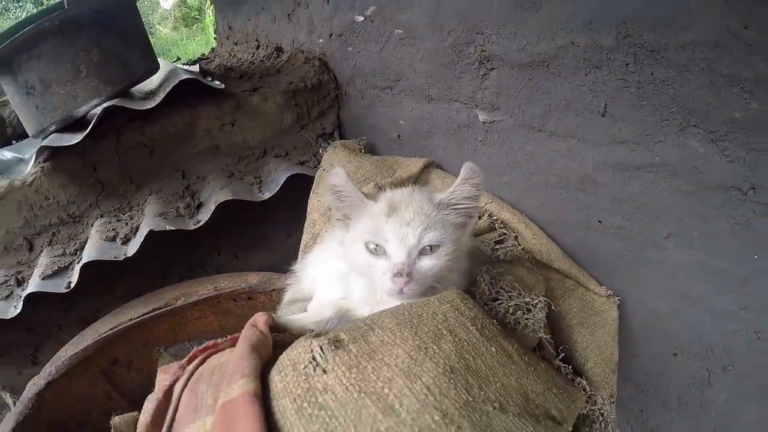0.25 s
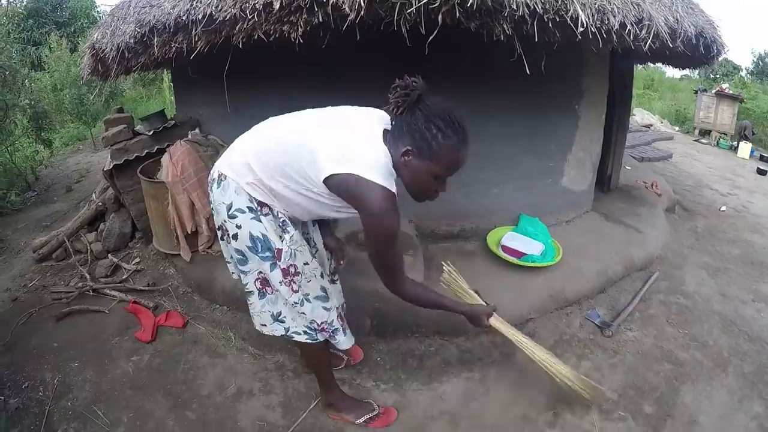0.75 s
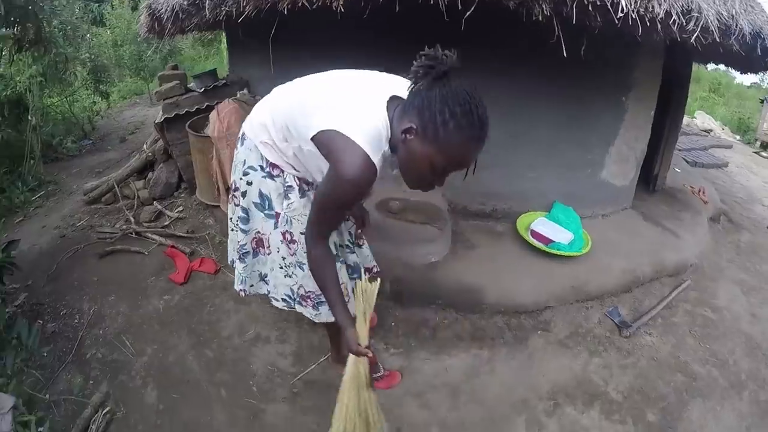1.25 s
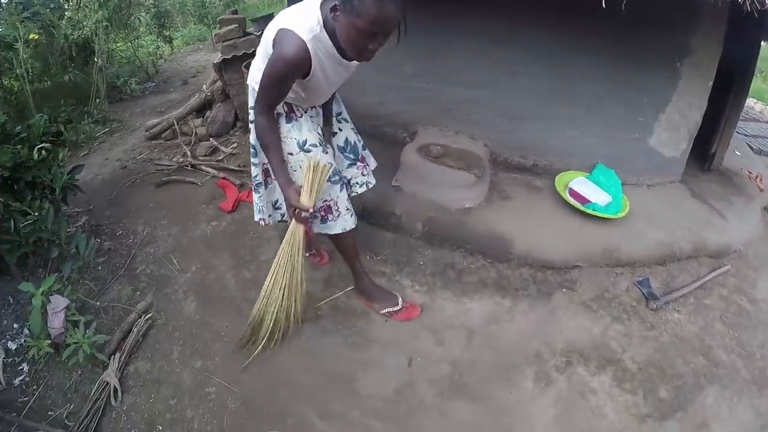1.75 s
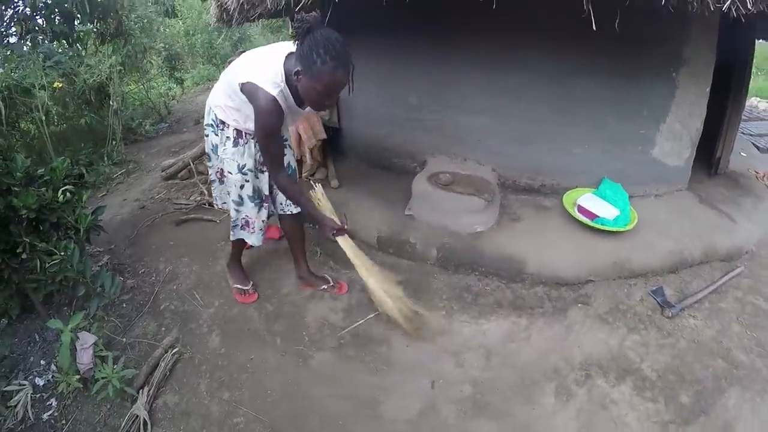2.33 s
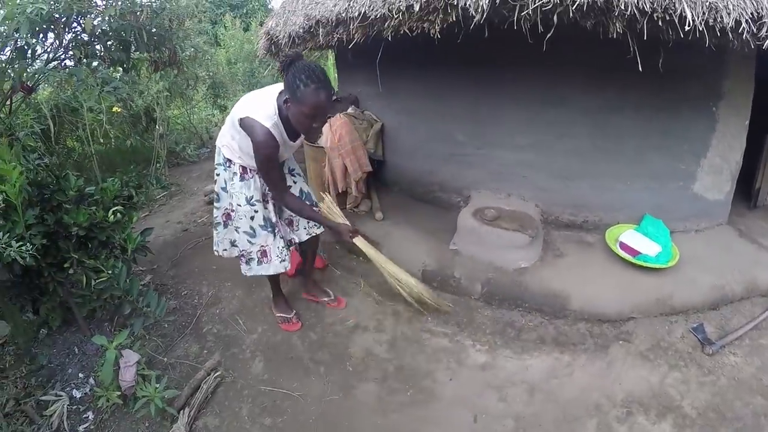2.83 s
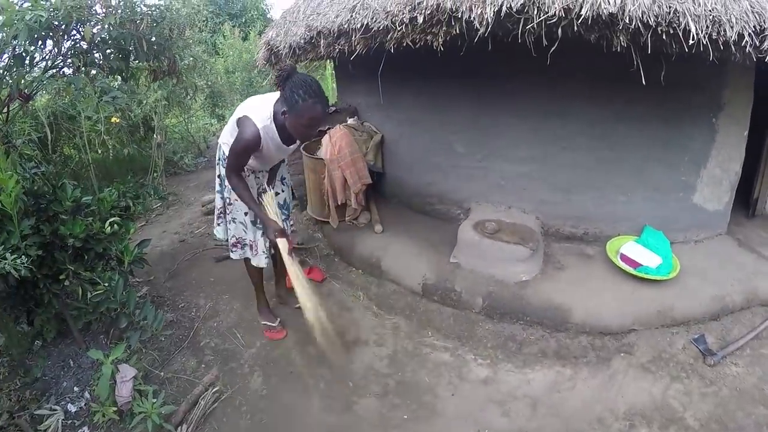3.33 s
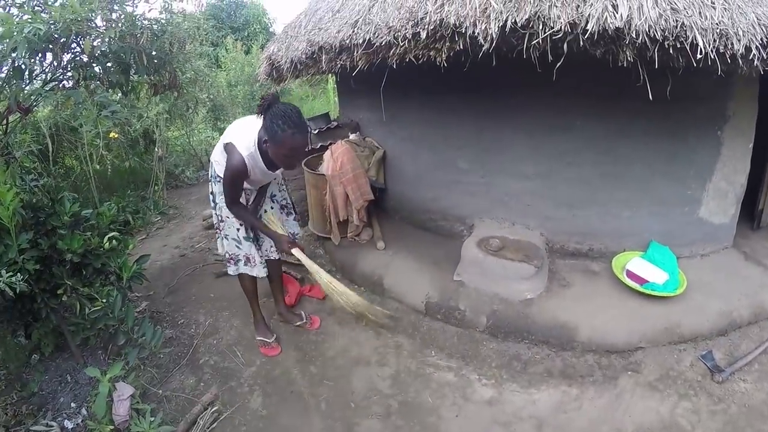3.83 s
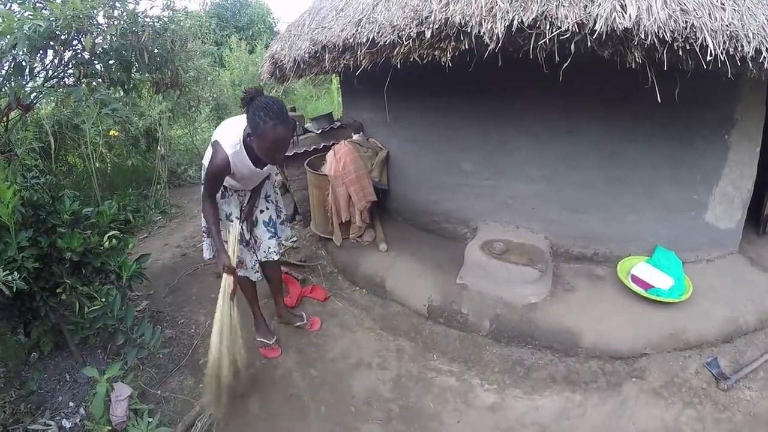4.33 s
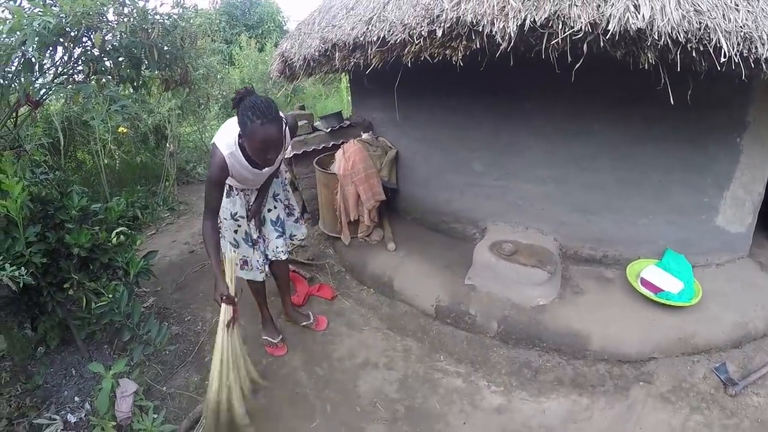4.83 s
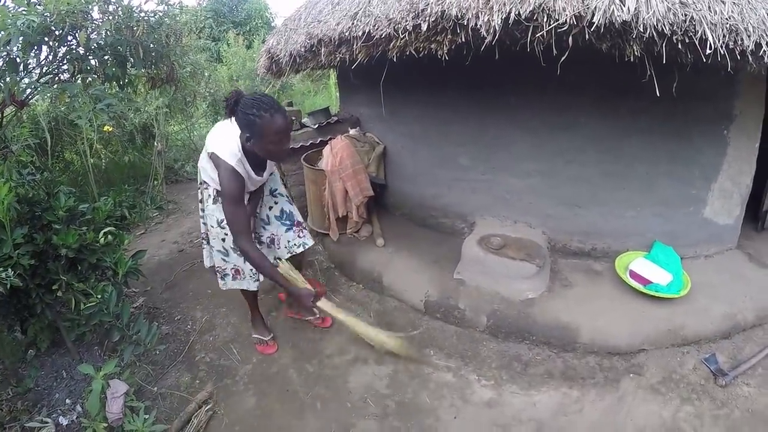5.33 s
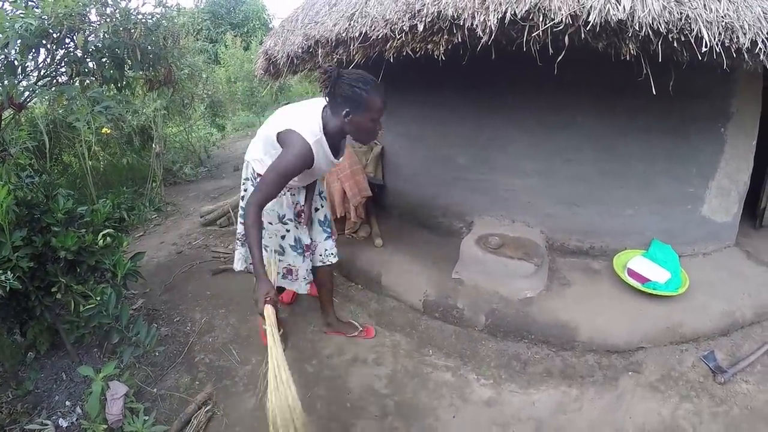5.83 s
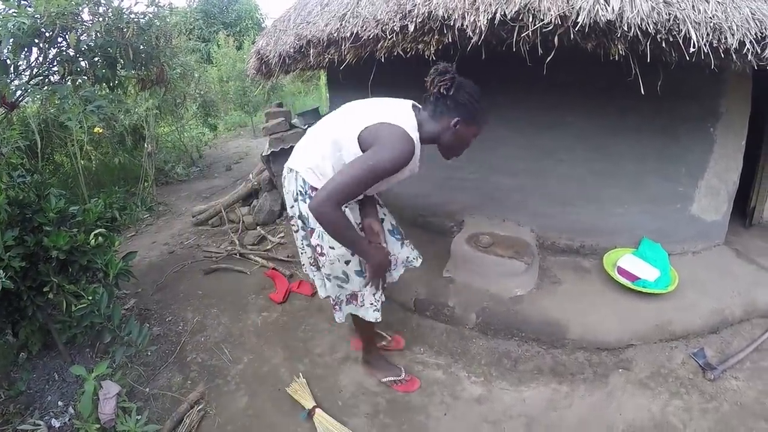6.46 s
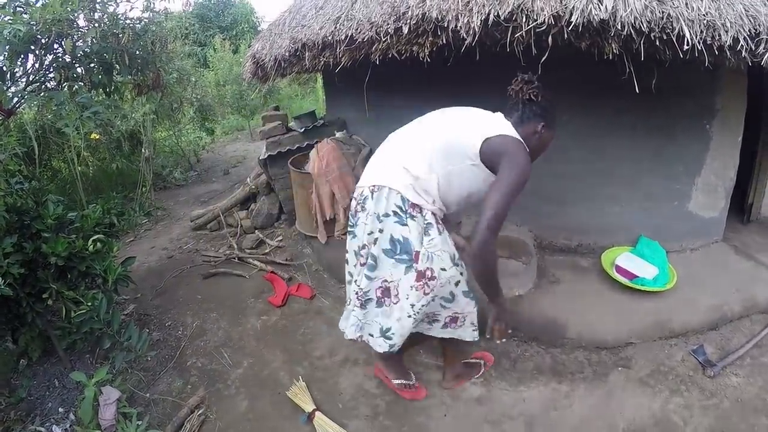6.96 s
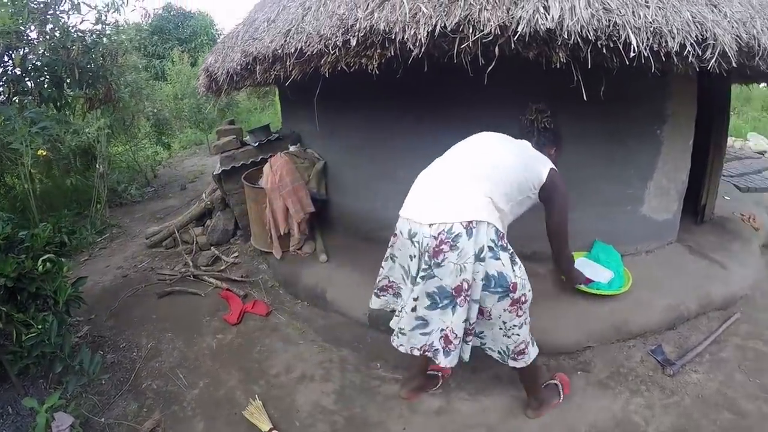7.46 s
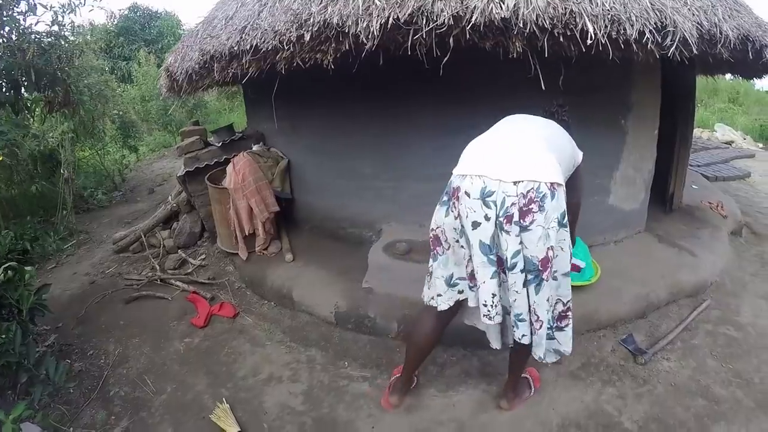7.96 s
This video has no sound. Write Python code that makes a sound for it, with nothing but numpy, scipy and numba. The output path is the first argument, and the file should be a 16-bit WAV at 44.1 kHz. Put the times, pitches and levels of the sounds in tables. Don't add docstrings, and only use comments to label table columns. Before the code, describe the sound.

A close, dull corner with soft wind rumble and a small knock lasts until 0.7 s, then the sound opens into a breezy yard. A far cock crows very faintly at 0.75-1.0 s and a small bird chirps near 0.9 s. A dry grass broom makes a long hissing stroke at 1.0-1.4, a short one at 1.7 with a clear dull knock, then swishes around 2.4, 3.1, 3.7, 4.2, 4.8 and, loudest, 5.5 s. Straw ticks, light brushes and gritty sandal scuffs fill the gaps; the bird calls at 3.1, 3.5 and 6 s. At 6.28 the dropped broom lands with a bright sharp crack and quick bounces, the loudest event. Sandals scrape jerkily from 6.5, squeak at 7.3 and slap once at 7.46. Chirps return at 6.85, 7.6 and 8.0; the breeze rises, and faint hollow plastic basin taps end it at 8.15.

```python
import sys
import numpy as np
from scipy import signal
from scipy.fft import rfft, irfft
from scipy.io import wavfile
from scipy.ndimage import uniform_filter1d
from numba import njit

SR = 44100
rng = np.random.default_rng(int(sys.argv[2]) if len(sys.argv) > 2 else 0)


def unload_wav(signal):
    wavfile.write(
        sys.argv[1],
        SR,
        np.round(np.clip(np.atleast_2d(signal).T, -1, 1) * 32767).astype(np.int16),
    )


def gain_from_db(level_db):
    decades = np.asarray(level_db, float) / 20
    return 10 ** decades


N = 361664

# t/s after the start, pitch f/Hz, level/dB
UP_AND_STEP = [
    [(0, 2500, -3), (.006, 2815, -3), (.017, 2973, 2), (.03, 3030, -9)],
    [(.031, 2577, 1), (.042, 2570, -0.5), (.056, 2560, -36), (.066, 2600, -29)],
]
DIP = [
    [(0, 3056, -8.5), (.036, 2517, 1), (.064, 2870, -3), (.093, 2810, -6.5)],
]
ARCH = [
    [(0, 2117, -15.5), (.006, 2247, -3.5), (.022, 2560, -4.5), (.04, 2155, -2.5)],
]


def level(x):
    return x / np.sqrt(np.mean(x ** 2))


def colour(x, points):
    hz, db = np.transpose(points)
    grid = np.maximum(np.arange(1025) * SR / 2048, 1)
    gain_db = np.interp(np.log(grid), np.log(hz), np.maximum(db, -60))
    cep = irfft(gain_db * np.log(10) / 20)
    cep[1:1024] *= 2
    cep[1025:] = 0
    return signal.fftconvolve(x, irfft(np.exp(rfft(cep))))[:N]


@njit
def svf(x, hz, width):
    y, b, l = np.empty(len(x)), 0., 0.
    for i in range(len(x)):
        g, k = np.tan(np.pi * hz[i] / SR), width / hz[i]
        v = (b + g * (x[i] - l)) / (1 + g * (g + k))
        b, l, y[i] = 2 * v - b, l + 2 * g * v, k * v
    return y


def band(x, hz, width):
    return svf(x, np.zeros(len(x)) + hz, float(width))


def steep(x, hz, width):
    return band(band(x, hz, width), hz, width)


def walk(rate):
    hold = int(SR / rate)
    steps = np.repeat(rng.standard_normal(N // hold + 1), hold)[:N]
    return level(uniform_filter1d(steps, hold))


def grains(scatter_db, patchy_db, rate):
    hard = np.minimum(rng.exponential(size=N), 4)
    patch = 2 * np.tanh(walk(rate) / 2)
    return rng.standard_normal(N) * gain_from_db(scatter_db * hard + patchy_db * patch)


def played(tables, fade_s=.003):
    t = np.arange(N) / SR
    rows = np.concatenate(tables).T
    gate = sum(np.clip(np.minimum(t - r[0][0], r[-1][0] - t) / fade_s + .5, 0, 1) for r in tables)
    return [np.interp(t, rows[0], c) for c in rows[1:]], np.minimum(gate, 1)


def loudest(tables):
    t = np.arange(N) / SR
    out = np.outer(np.r_[-120, tables[0][0][2:]], np.ones(N))
    for rows in tables:
        rows = np.transpose(rows)
        on = slice(int(rows[0, 0] * SR), int(rows[0, -1] * SR))
        now = np.array([np.interp(t[on], rows[0], c) for c in rows[1:]])
        out[:, on] = np.where(now[0] > out[0, on], now, out[:, on])
    return out


def add(out, s, sound):
    i = int(s * SR)
    out[i:i + len(sound)] += sound[:N - i]


def air():
    # t/s, level/dB
    breeze = [(0.0, -1.5), (0.5, 1.5), (0.72, 0), (0.9, -3), (1.3, 0), (1.5, 1.5), (2.4, 3), (5.4, -3),
              (5.5, -1.5), (6.9, 0), (7.15, -3.5), (7.68, 2), (8.2, 11.5)]
    corner_ends_s = .725
    # flutter, low hush, leaf hiss in dB; then how far each follows the breeze
    corner_db, open_yard_db = (-56, -64.5, -62), (-65, -65, -67.5)
    breeze_share = (0.6, 0.38, 1.27)
    (breeze_db,), _ = played([breeze])
    corner = np.arange(N) < corner_ends_s * SR
    return [np.where(corner, a, b) + k * breeze_db for a, b, k in zip(corner_db, open_yard_db, breeze_share)]


def wind():
    # t/s, level/dB
    gusts = [(0.0, -53.5), (0.91, -53), (2.12, -58.5), (2.3, -54.5), (3.19, -58), (3.4, -52), (4.57, -58.5),
             (4.7, -54.5), (6.12, -54.5), (7.0, -54.5), (8.2, -52)]
    (rumble_db,), _ = played([gusts])
    rumble = level(steep(rng.standard_normal(N), 33, 38))
    flutter = level(steep(rng.standard_normal(N), 75, 70))
    return gain_from_db(rumble_db) * rumble + gain_from_db(air()[0]) * flutter


def yard():
    # f/Hz, level per Hz/dB
    hush_tone = [(76, -34), (130, -3), (224, -6.5), (349, -9), (444, -11), (664, -11.5), (1220, -13.5),
                 (1340, -15), (1930, -12), (14200, -27.5), (16000, -26)]
    _, low_db, leaf_db = air()
    hush = colour(rng.standard_normal(N), hush_tone)
    low, leaves = 0, 0
    for hz in 140 * 2 ** np.arange(0, 7, .5):
        part = gain_from_db(3.15 * walk(9)) * band(hush, hz, hz / 2.0)
        share = np.clip(np.log2(hz / 700) / 2, 0, 1)
        low = low + (1 - share) * part
        leaves = leaves + share * part
    return gain_from_db(low_db + 0.5) * level(low) + gain_from_db(leaf_db - 1.5) * level(leaves)


def knocks():
    # t/s, peak level/dB, ring f/Hz, crack level/dB, thud level/dB
    blows = [(0.083, -34.5, 1550, -8, -19), (0.088, -37, 950, -12, -5), (1.624, -43.5, 814, -20, -2),
             (1.691, -28, 970, -12, -4.5), (1.748, -47, 1110, -9, -5), (1.857, -47, 704, -20, -3),
             (2.376, -38.5, 1350, -9, -6.5), (2.989, -38, 660, -11, -27), (5.49, -33.5, 1840, 3, -14.5),
             (6.289, -40, 890, -20, -5.5), (6.782, -51.5, 714, -20, 3), (7.475, -36.5, 1080, 2, -16.5),
             (7.824, -45.5, 1720, -11, -1)]
    # multiple of the ring f, level/dB
    modes = [(.5, 5.5), (1, 16), (1.7, 7)]
    rattle_t60_s = 0.019
    out, t = np.zeros(N), np.arange(3000) / SR
    for (s, db, hz, crack_db, thud_db), noise in zip(blows, rng.standard_normal((len(blows), len(t)))):
        blow = 0.16 * noise * 1000. ** (-t / rattle_t60_s)
        blow[0] += 1
        ring = sum(gain_from_db(d) * steep(blow, m * hz, 0.58 * m * hz) / m for m, d in modes)
        crack = steep(steep(blow, 2760, 2200), 2920, 2700)
        thud = steep(blow, 272, 240)
        parts = ((0, ring), (crack_db, crack), (thud_db, thud))
        add(out, s + 0.00103, sum(gain_from_db(db + d) * p / np.abs(p).max() for d, p in parts))
    return out


def ticks():
    # t/s, peak level/dB, f/Hz, t60/s
    snaps = [(0.3726, -50, 4000, 0.006), (0.84, -50, 8220, 0.006), (0.9476, -41, 9400, 0.006),
             (1.525, -43, 4150, 0.006), (1.5556, -33, 7000, 0.009), (1.6671, -36.5, 4690, 0.0084),
             (1.7747, -37, 7950, 0.006), (1.9314, -46, 3470, 0.006), (2.0305, -31.5, 4260, 0.0069),
             (2.1655, -40.5, 4440, 0.0088), (2.64, -32.5, 3970, 0.012), (2.885, -38, 3820, 0.006),
             (3.3, -33, 9860, 0.0058), (3.482, -52, 3000, 0.006), (5.156, -38, 4930, 0.008),
             (5.214, -48, 3740, 0.0077), (5.8247, -41, 9750, 0.006), (5.872, -41, 3710, 0.0098),
             (5.895, -42, 6991, 0.0064), (6.2635, -45, 3500, 0.0041), (6.2703, -44, 7000, 0.005),
             (6.2735, -43, 9000, 0.005), (6.3255, -27, 9000, 0.0066), (6.335, -25, 6000, 0.0065),
             (2.1191, -43, 4400, 0.008), (2.6229, -43, 8110, 0.006), (2.9726, -36, 2860, 0.011),
             (3.913, -56, 4870, 0.006), (4.0337, -43, 6900, 0.006), (4.9067, -51, 6512, 0.006),
             (5.1128, -51, 10000, 0.006), (5.1422, -49, 6519, 0.0054), (5.3657, -52, 3830, 0.006),
             (5.9424, -48, 6000, 0.006), (5.99, -49, 8000, 0.01), (6.03, -48, 5300, 0.008),
             (0.708, -43, 3000, 0.01), (6.2767, -18, 7060, 0.006), (6.2841, -11, 7000, 0.0049),
             (6.2874, -12, 10000, 0.0079), (6.3048, -24, 9590, 0.0067), (6.5493, -41.5, 8940, 0.008),
             (6.696, -37.5, 3780, 0.0062), (6.763, -35, 3050, 0.0057), (7.204, -35, 5000, 0.006),
             (7.213, -38, 6000, 0.006), (7.226, -39, 7000, 0.006), (7.326, -36, 4500, 0.006),
             (7.351, -37, 4000, 0.006), (7.372, -35, 3500, 0.0065), (7.258, -41, 3000, 0.006),
             (7.274, -41, 5000, 0.006), (6.9525, -45.5, 5660, 0.006), (7.483, -42, 5460, 0.012)]
    edge_db = -9
    out, t = np.zeros(N), np.arange(900) / SR
    for (s, db, hz, t60), noise in zip(snaps, rng.standard_normal((len(snaps), len(t)))):
        snap = noise * 1000. ** (-t / max(t60, .002))
        ring = steep(snap, hz, 0.96 * hz)
        edge = steep(snap, 10900, 11000)
        add(out, s, gain_from_db(db) * (ring / np.abs(ring).max() + gain_from_db(edge_db) * edge / np.abs(edge).max()))
    return out


def slips(rows, rise_db, sag_db, hollow_db):
    grip_s = .004
    tables = []
    for s, up, long, db, hz in rows:
        grit_db = np.interp(hz, [2100, 2700], [-17.5, -4.5])
        shape = ((-grip_s / 4, -40.5), (0, -rise_db), (up, 0), (long, -sag_db), (long + 2 * grip_s, -40.5))
        tables.append([(s + t, db + d, hollow_db, grit_db, hz) for t, d in shape])
    return tables


def sandals():
    # start t/s, build-up t/s, length t/s, level/dB, sole ring f/Hz
    steps = [(1.32, 0.021, .07, -54, 2780), (1.845, 0.01, 0.02, -54, 2800), (2.655, 0.07, 0.11, -44, 2350),
             (2.7, 0.05, 0.09, -40, 2310), (2.75, 0.037, 0.044, -43.5, 2500),
             (3.33, 0.078, 0.12, -52, 2640), (7.405, 0.01, 0.025, -51, 2860)]
    # start t/s, build-up t/s, length t/s,
    # level/dB, sole ring f/Hz
    drags = [(0.525, 0.037, 0.048, -56.5, 2120), (1.806, 0.015, 0.048, -48, 2860),
             (2.88, 0.0061, 0.07, -49.5, 2480), (2.93, 0.025, 0.042, -47, 2620),
             (2.972, 0.011, 0.048, -40.5, 2760), (6.722, 0.088, .1, -50.5, 3000),
             (6.95, 0.026, 0.063, -61, 2700), (7.81, 0.05, 0.22, -55, 2200),
             (8.02, 0.06, 0.094, -54.5, 2600), (8.122, 0.053, 0.081, -51, 2250)]
    # start t/s, build-up t/s, length t/s, level/dB, sole ring f/Hz
    jerks = [(6.097, 0.013, 0.026, -43, 2800), (6.146, 0.0033, 0.017, -43.5, 2730),
             (6.172, 0.012, 0.074, -48.5, 2770), (6.558, 0.0045, 0.026, -47.5, 2630),
             (6.624, 0.0023, 0.014, -47, 2900), (6.641, 0.013, 0.02, -46.5, 2670),
             (6.693, .003, 0.01, -51, 2770), (6.708, .003, 0.012, -53, 2770),
             (6.79, .004, 0.028, -48, 3000), (7.189, 0.0033, 0.018, -46, 2180),
             (7.21, 0.0043, 0.021, -45, 2500), (7.242, 0.0018, 0.0057, -42, 2040),
             (7.251, 0.034, 0.061, -45, 1900), (7.304, .003, 0.016, -42, 2050),
             (7.317, 0.0073, 0.018, -43, 2560), (7.339, 0.0071, 0.052, -39.5, 2030),
             (7.376, .008, 0.056, -48, 2900)]
    # f/Hz, level per Hz/dB
    grit_tone = [(1500, -21.5), (4000, -9), (6000, -2), (10000, -4.5), (15000, -19.5)]
    moves = slips(steps, rise_db=10, sag_db=5, hollow_db=0)
    moves += slips(drags, rise_db=7.5, sag_db=6, hollow_db=-6.5)
    moves += slips(jerks, rise_db=1, sag_db=8, hollow_db=-11.5)
    db, hollow_db, grit_db, sole_hz = loudest(moves)
    rub = grains(scatter_db=2.0, patchy_db=2.2, rate=140)
    light = np.clip((sole_hz - 2300) / 400, 0, 1)
    ring = (1 - light) * level(steep(rub, sole_hz, 740)) + light * level(steep(rub, sole_hz, 1600))
    sole = ring + level(steep(rub, 1.46 * sole_hz, 3690)) + 0.41 * level(steep(rub, 1430, 430))
    hollow = level(steep(rub, 1036, 680)) + 0.29 * level(steep(rub, 730, 600))
    hollow = hollow + 0.18 * level(steep(rub, 300, 250))
    grit = level(colour(rub, grit_tone))
    return gain_from_db(db - 2) * (sole + gain_from_db(hollow_db) * hollow + gain_from_db(grit_db) * grit)


def whistle(tables, waver_db, rough):
    (hz, db), gate = played(tables, fade_s=0.0037)
    hz = hz * (1 + .012 * walk(300))
    tone = np.sqrt(2) * np.sin(2 * np.pi * np.cumsum(hz) / SR)
    breath = level(steep(rng.standard_normal(N), hz, 0.14 * hz.mean()))
    return gate * gain_from_db(db + waver_db * 2 * np.tanh(walk(140) / 2)) * (tone + rough * breath)


def cock():
    # t/s, pitch f/Hz, level/dB
    crow = [(0.75, 1032, -72), (0.786, 1040, -70), (0.836, 982, -68), (0.984, 977.9, -73),
            (0.992, 1047, -76), (1.01, 1045, -79)]
    return whistle([crow], waver_db=3.5, rough=0.22)


def contacts(rows, rise_db, sag_db, land_db_s, leave_db_s, press_db):
    fade_db = 80
    return [[(touch - fade_db / land_db_s, db - rise_db - fade_db, w - press_db),
             (touch, db - rise_db, w - press_db),
             (top, db, w),
             (lift, db - sag_db, w + press_db),
             (lift + fade_db / leave_db_s, db - sag_db - fade_db, w + press_db)]
            for touch, top, lift, db, w in rows]


def broom(tables, straw, bunch_db, scatter_db, patchy_db):
    # f/Hz, level per Hz/dB
    earth = [(290, -41.5), (500, -23.5), (1170, -10), (1410, -10.5), (1780, -4.5), (2290, -3), (2630, 0),
             (4000, -4.5), (5200, -9.5), (8800, -120)]
    hiss_db, weight_db = loudest(tables)
    tips = level(colour(grains(scatter_db, patchy_db, rate=140), straw))
    bunch_hz = 6000 * 2 ** (0.5 * np.tanh(walk(14)))
    bunch = gain_from_db(2.0 * walk(30)) * level(band(tips, bunch_hz, 2600))
    scrape = level(colour(grains(scatter_db, patchy_db, rate=60), earth))
    return gain_from_db(hiss_db - 1.5) * (tips + gain_from_db(bunch_db) * bunch + gain_from_db(weight_db + 1.0) * scrape)


def sweeping():
    # touch t/s, fastest t/s, lift t/s, straw hiss level/dB, weight on the earth level/dB
    strokes = [
        (0.97, 1.18, 1.378, -40, -5.5),
        (1.69, 1.75, 1.775, -45.5, -6.5),
        (2.3, 2.42, 2.531, -40, -7),
        (2.97, 3.11, 3.2, -40.5, -8.5),
        (3.61, 3.67, 3.72, -40.5, -8),
        (4.06, 4.17, 4.31, -39.5, -9),
        (4.71, 4.8, 4.85, -41, -5.5),
        (4.9, 4.94, 4.965, -49, -9),
        (5.42, 5.53, 5.62, -37.5, -4.5),
    ]
    # touch t/s, fastest t/s,
    # lift t/s, straw hiss level/dB, weight level/dB
    brushes = [(0.76, 3.0, 6.9, -65, -1), (0.838, 0.893, 0.91, -59.5, -8), (1.51, 1.55, 1.737, -60, -4.5),
               (1.87, 1.922, 1.95, -62.5, -14), (2.14, 2.22, 2.32, -55, -2), (2.67, 2.74, 2.8, -50, 6),
               (2.8, 2.82, 2.87, -55, 2.5), (6.9, 7.0, 7.5, -66, -12), (6.96, 6.98, 7.02, -59, -10),
               (2.39, 2.42, 2.44, -39.5, -12), (1.39, 1.4, 1.39, -48.5, -3),
               (4.815, 4.834, 4.83, -39, -1.5), (2.87, 2.89, 3.7, -57, -16),
               (3.289, 3.31, 3.4, -49.5, -1.5), (3.36, 3.42, 3.44, -47.5, 3.5),
               (3.496, 3.56, 3.45, -55.5, -7), (3.958, 4.033, 4.12, -55, -7.5), (4.493, 4.62, 4.71, -60, 2),
               (5.12, 5.154, 5.2, -65, -1), (5.68, 5.72, 5.79, -54.5, -11), (5.81, 5.87, 5.9, -60.5, -15),
               (5.96, 6.026, 6.08, -61.5, -14)]
    # f/Hz, level per Hz/dB
    straw_tone = [(2060, -26), (3500, -4.5), (5640, -3.5), (6490, -5), (11600, -5), (14600, -7.5),
                  (15700, -6), (16000, -47.5)]
    moves = contacts(strokes, rise_db=8, sag_db=7, land_db_s=335, leave_db_s=148, press_db=0.5)
    moves += contacts(brushes, rise_db=5, sag_db=6.5, land_db_s=402, leave_db_s=349, press_db=1.5)
    return broom(moves, straw_tone, bunch_db=-9, scatter_db=2.5, patchy_db=1.16)


def bird():
    # (start t/s, level/dB)
    song = [(UP_AND_STEP, [(0.862, -55), (3.119, -54), (6.848, -52.5), (7.609, -52.5)]),
            (DIP, [(3.49, -52.5), (5.955, -53), (8.032, -51)]), (ARCH, [(6.055, -53.5)])]
    rows = [(s, db, call) for call, times in song for s, db in times]
    notes = []
    for (s, db, call), u in zip(rows, rng.standard_normal(len(rows))):
        for note in call:
            notes.append([(s + t, hz * (1 + .006 * u), db + d) for t, hz, d in note])
    return whistle(sorted(notes), waver_db=3.0, rough=0.35)


def dropped_broom():
    # touch t/s, hardest t/s, lift t/s, straw level/dB, bundle level/dB
    bounces = [
        (6.279, 6.285, 6.29, -22.5, -10.5),
        (6.29, 6.296, 6.31, -31.5, -15),
        (6.308, 6.314, 6.326, -36, -26),
        (6.324, 6.332, 6.342, -33.5, -26),
        (6.342, 6.346, 6.352, -41, -26),
        (6.36, 6.375, 6.42, -62, -23),
    ]
    # f/Hz, level per Hz/dB
    loose_tone = [(590, -47.5), (1000, -14.5), (1610, -13.5), (2150, -10.5), (4960, -3), (12400, -3.5),
                  (15300, -8), (16000, -30)]
    moves = contacts(bounces, rise_db=5, sag_db=2, land_db_s=2999, leave_db_s=1095, press_db=3.5)
    return broom(moves, loose_tone, bunch_db=-21, scatter_db=3.0, patchy_db=2.0)


def squeaks():
    # start t/s, length t/s, pitch f/Hz, level/dB
    chirps = [
        (7.304, 0.0087, 2100, -35.5),
        (7.317, 0.012, 3460, -44),
        (7.35, .007, 3330, -46),
    ]
    tables = [[(s, hz, db - 1), (s + long / 2, hz, db), (s + long, hz, db - 5)] for s, long, hz, db in chirps]
    return whistle(tables, waver_db=3.5, rough=0.26)


def clack():
    # f/Hz, level/dB, t60/s
    modes = [(740, -9, 0.011), (1210, 2, 0.029), (1550, -1, 0.011), (2050, 7, 0.012), (2960, 3, 0.011),
             (3920, -1, .004)]
    slap_s, slap_db, edge_db = 7.4622, -18.5, -16
    out, t = np.zeros(N), np.arange(2000) / SR
    ring = -sum(gain_from_db(d) * np.sin(2 * np.pi * hz * t) * 1000. ** (-t / min(t60, .03)) for hz, d, t60 in modes)
    ring = ring * (1 - np.exp(-t / .0003))
    edge = steep(1. * (t == 0), 2000, 3500)
    slap = ring / np.abs(ring).max() - gain_from_db(edge_db) * edge / np.abs(edge).max()
    add(out, slap_s, gain_from_db(slap_db) * slap)
    return out


def basin():
    # t/s, peak level/dB
    taps = [
        (8.128, -44.5),
        (8.145, -41),
        (8.183, -42.5),
    ]
    # f/Hz, level/dB, t60/s
    modes = [(190, 5, 0.065), (488, 8, 0.095), (634, -9, 0.045), (860, -7, 0.034)]
    out, t = np.zeros(N), np.arange(4000) / SR
    ring = sum(gain_from_db(d) * np.sin(2 * np.pi * hz * t) * 1000. ** (-t / t60) for hz, d, t60 in modes)
    for s, db in taps:
        add(out, s, gain_from_db(db) * ring / np.abs(ring).max())
    return out


def outdoors(x):
    wall_echo_s, wall_db, yard_t60_s, yard_db = .009, -17.5, 0.25, -21.5
    t = np.arange(int(.4 * SR)) / SR
    tail = rng.standard_normal(len(t)) * 1000. ** (-t / yard_t60_s)
    tail = gain_from_db(yard_db) * tail / np.sqrt(np.sum(tail ** 2))
    add(tail, wall_echo_s, gain_from_db(wall_db) * np.ones(1))
    return signal.fftconvolve(x, tail)[:N]


def scene():
    near = knocks() + ticks() + sandals() + sweeping() + dropped_broom() + squeaks() + basin()
    far = cock() + bird()
    echoes = outdoors(near + 3.3 * far)
    mono = wind() + yard() + near + far + clack() + echoes
    return np.array([mono, mono])


def top_cut(x):
    return signal.sosfilt(signal.butter(12, 16360, fs=SR, output="sos"), x)


def record(dry):
    top_hz = 15230
    low_pass = signal.ellip(6, .3, 32, top_hz, fs=SR, output="sos")
    mix = signal.sosfilt(low_pass, dry)
    return top_cut(mix)


dry = scene()
out = record(dry)
unload_wav(out)
```